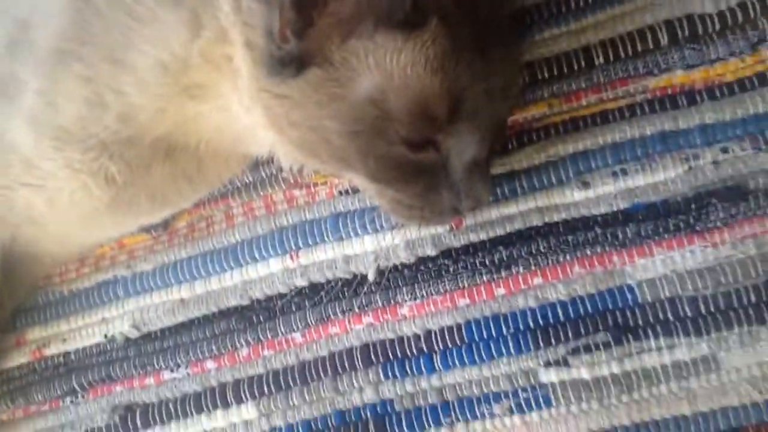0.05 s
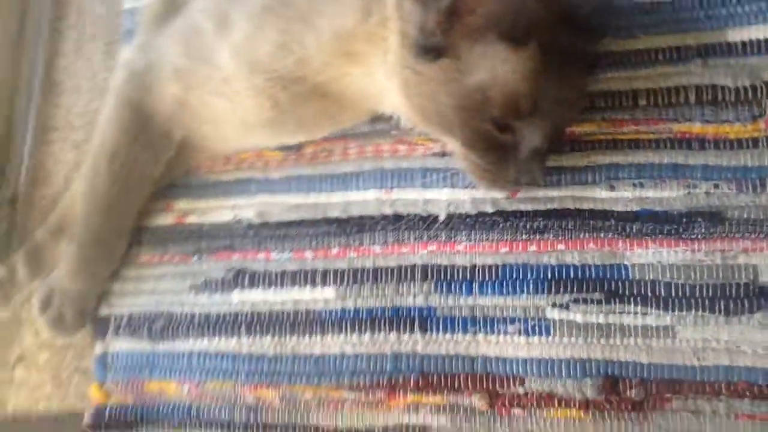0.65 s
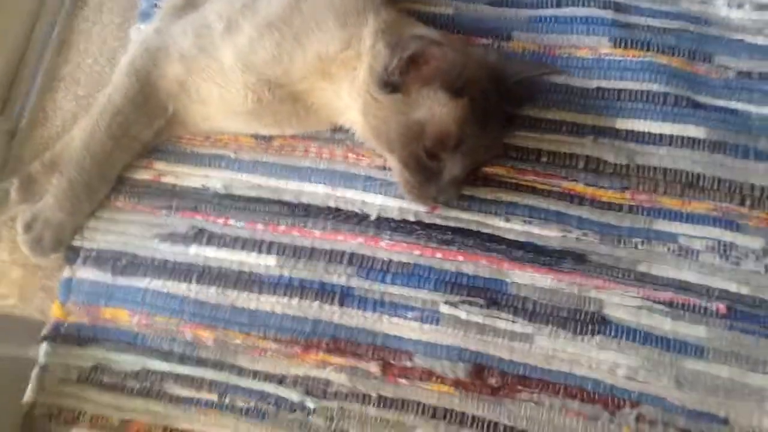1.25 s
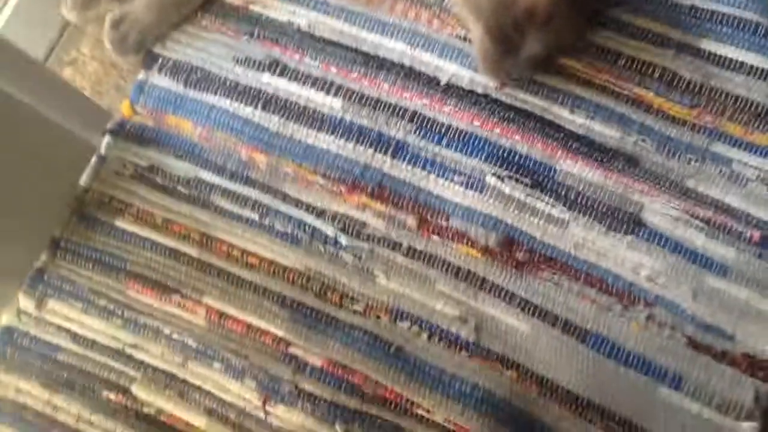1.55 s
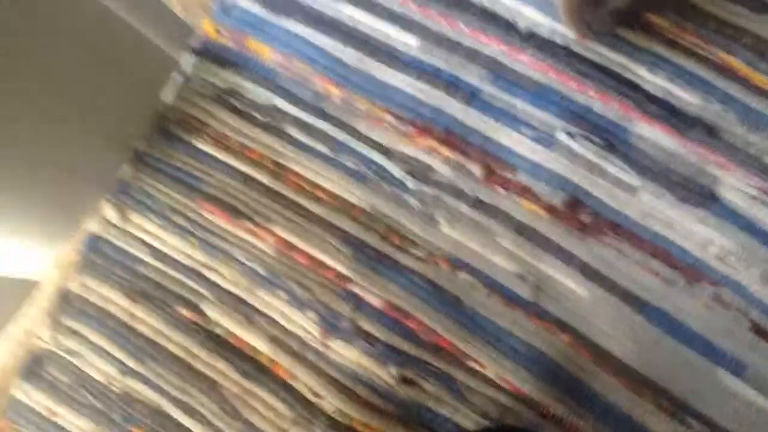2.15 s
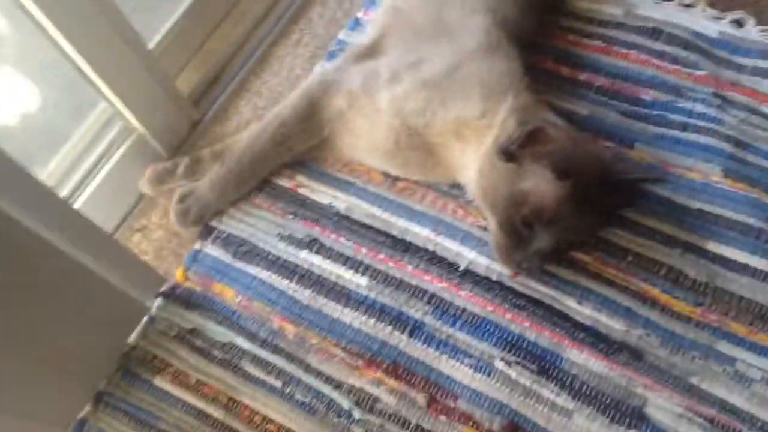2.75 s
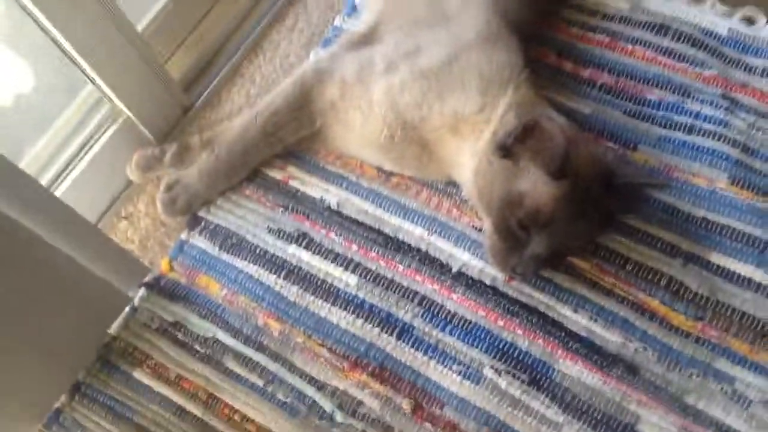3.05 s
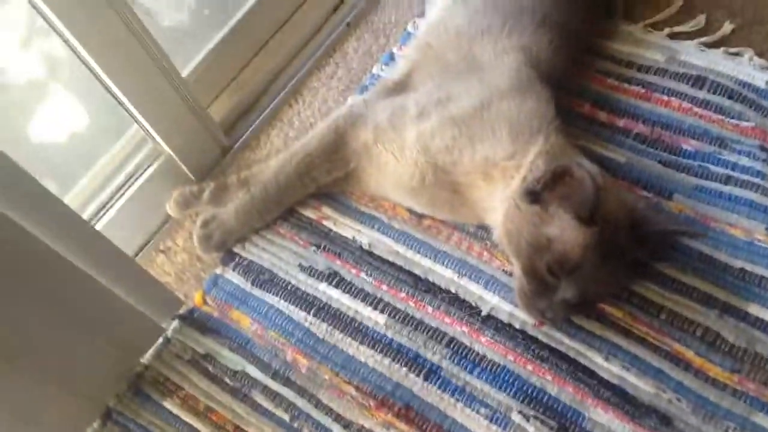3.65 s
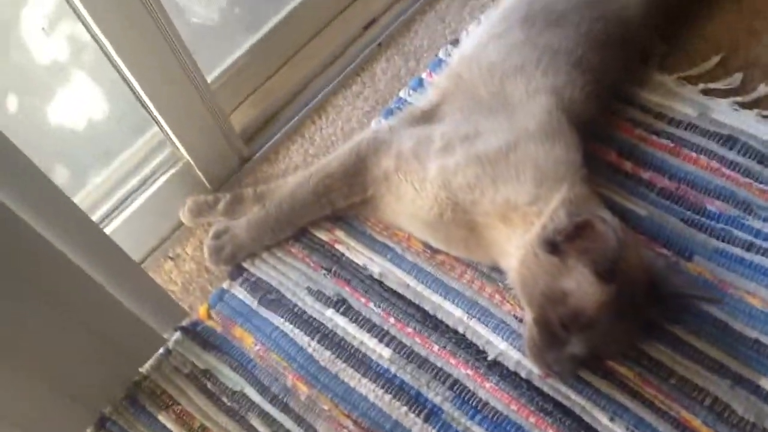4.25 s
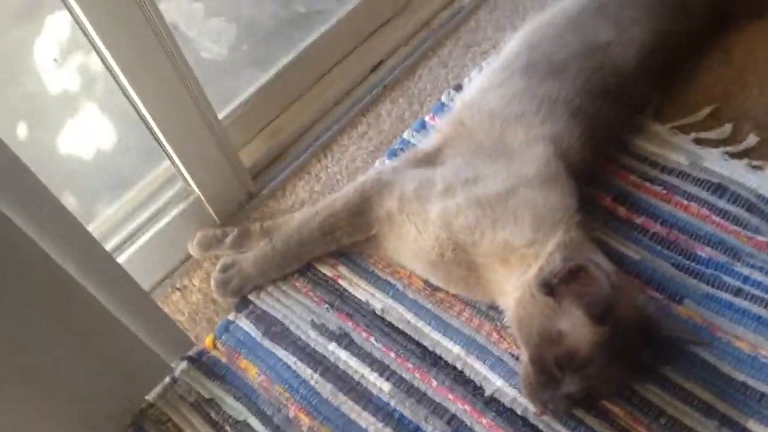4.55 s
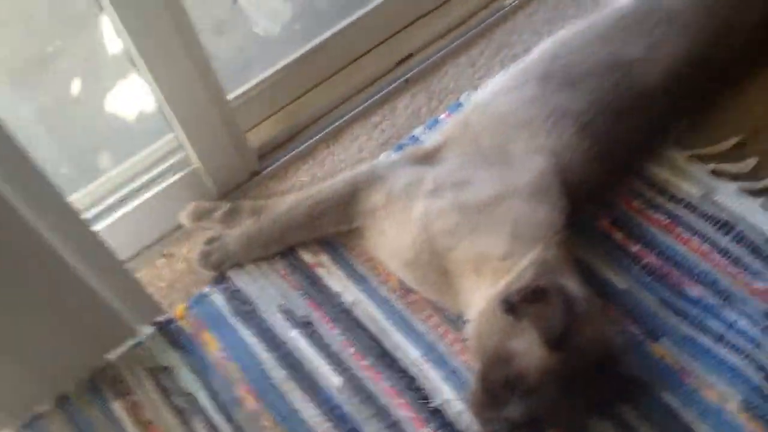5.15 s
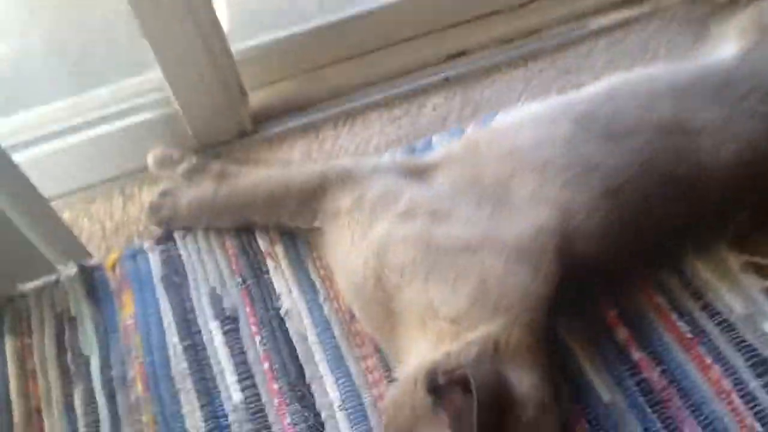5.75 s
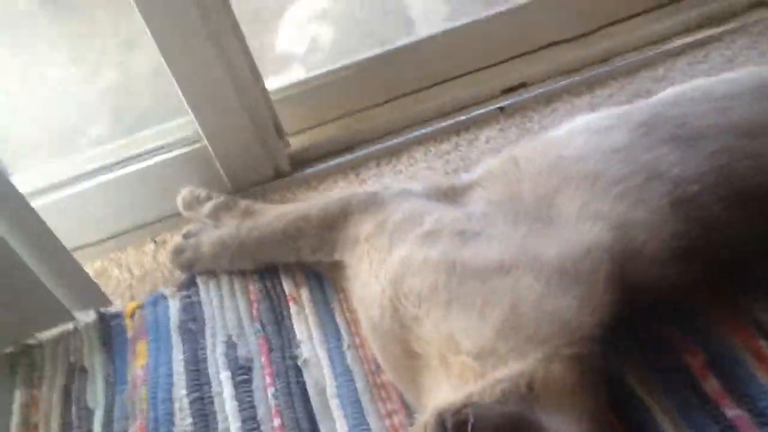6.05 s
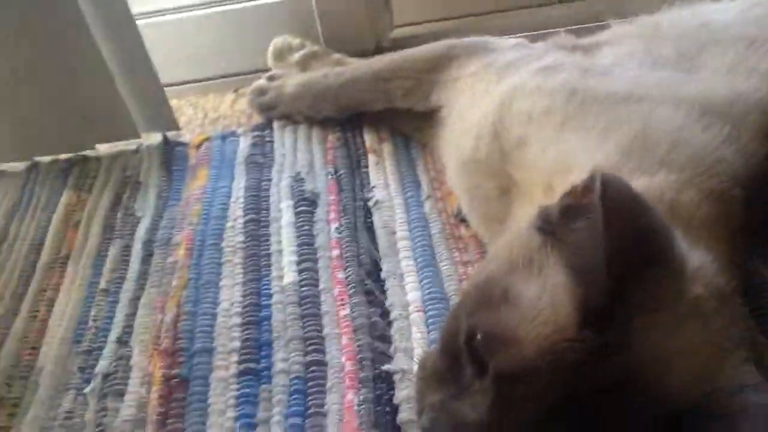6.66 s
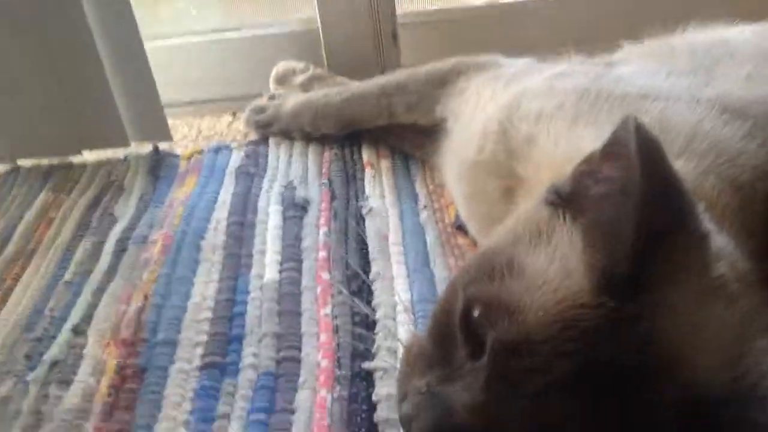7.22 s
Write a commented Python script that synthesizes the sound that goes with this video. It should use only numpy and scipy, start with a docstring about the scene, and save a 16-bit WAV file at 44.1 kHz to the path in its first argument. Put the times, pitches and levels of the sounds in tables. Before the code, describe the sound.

A quiet room is heard through a hand-held phone, with soft background noise and a faint, wavering appliance hum throughout. At about 1.6 seconds a finger scrapes across the microphone with a thump: short, rasping, very close and by far the loudest sound. Smaller knocks, rubs and sticky skin snaps follow until about 2.5 seconds, with a sharp pair of clicks near 1.9, while the finger briefly muffles the room. A couple of thin ticks come between 3 and 3.5 seconds. From about 3.8 to 6.7 seconds a small bird outside gives very faint, high, falling chirps in loose groups. From around 5.3 seconds a sleeve rustles softly, along with a slight outdoor hiss. The case ticks at 6.7 seconds, and the grip shifts with a quick double knock at 6.9. Faint rustle and hum remain until the end, at about 7.5 seconds.

```python
"""A finger scrapes loudly across a phone's microphone port, with thumps and ticks in the case.
The skin slips and sticks, rasping through the case's resonances, and briefly covers the port,
dulling the room. Later a sleeve rustles as the arm moves, and the grip shifts with a double knock.
Behind it all lies a quiet room, where an appliance hums and a small bird chirps outside."""
import sys
import numpy as np
from scipy import signal
from scipy.fft import rfft, irfft, next_fast_len
from scipy.io import wavfile
from scipy.ndimage import map_coordinates

SR = 44100
rng = np.random.default_rng(int(sys.argv[2]) if len(sys.argv) > 2 else 0)


def unload_audio(sound):
    """Save the sound as a 16-bit wav file, at the path given as the first command line argument."""
    columns = np.transpose(np.atleast_2d(sound))
    # keep every value between -1 and 1, then stretch to whole-number steps
    steps = np.round(np.clip(columns, -1, 1) * 32767)
    wavfile.write(sys.argv[1], SR, steps.astype(np.int16))


N = 330210

# Tone of the scrape. Each row: frequency in Hz, relative level in dB.
SCRAPE_SPECTRUM = [(40, -43), (75, -30), (115, -7), (200, -2.5), (290, -4), (400, -4), (580, -9.5),
                   (900, -8), (1400, -12), (2200, -18), (3200, -17), (5200, -20.5), (9000, -33.5),
                   (15500, -49)]
# Resonances of the case. Each row: centre in Hz, width in Hz, lift in dB.
CASE_RESONANCES = [(263, 52, 4.5), (380, 48, 1), (523, 64, 6), (960, 120, 1.5), (1855, 110, 8),
                   (2152, 150, 8), (2850, 240, 1.5), (5100, 380, -0.5)]
# The hand bumps the case. Each row: start in seconds, thump peak in dB, ring pitch in Hz,
# time to fade by 60 dB in seconds, click peak in dB.
HAND_KNOCKS = [(1.5094, -39, 168.5, .028, -41.5), (1.6099, -6.5, 322, 0.023, -16),
               (1.617, -20, 183, 0.096, -35), (1.6554, -14, 258, .03, -30),
               (1.7725, -28.5, 168.5, 0.046, -35.5), (1.9676, -26, 132, 0.024, -59.5),
               (2.0515, -40, 178, 0.027, -49), (2.172, -43.5, 202, 0.013, -56),
               (2.195, -56, 240, .015, -48), (2.2606, -35.5, 195, .045, -38.5),
               (2.4048, -46, 220, .015, -33.5), (2.428, -43, 200, .022, -54),
               (2.52, -45.5, 242, 0.019, -44.5), (6.4118, -56, 300, 0.0092, -47),
               (6.567, -45, 160, 0.048, -54), (6.8638, -24.5, 168, 0.016, -25.5),
               (6.8695, -20.5, 335, 0.016, -20.5), (6.8972, -23.5, 230, 0.022, -32),
               (6.906, -31, 450, 0.0087, -25.5), (6.9264, -43, 400, 0.011, -35.5),
               (7.103, -50, 300, 0.014, -45)]
# Sticky skin lets go. Each row: start in seconds, peak in dB.
SKIN_SNAPS = [(1.5096, -38), (1.9199, -19.5), (1.931, -39), (1.9386, -25.5), (1.9444, -45), (2.001, -43),
              (2.0346, -44), (2.269, -46), (2.3472, -43), (2.422, -42), (6.8277, -36)]
# Finger strokes on the case. Each row: peak time in seconds, half length in seconds, rumble in dB,
# hiss in dB, hiss centre in Hz, hiss width in octaves.
FINGER_STROKES = [(1.539, 0.052, -55, -59.5, 5000, 2.3), (1.614, 0.016, -48, -34, 5000, 0.85),
                  (1.673, 0.024, -59, -41.5, 4960, .9), (1.765, 0.021, -64, -60, 1490, 1.4),
                  (1.785, 0.021, -51, -45, 8260, 1.1), (1.878, .0072, -51.5, -37, 7540, 1.07),
                  (1.904, 0.022, -41, -62.5, 4000, 1), (1.946, 0.031, -42, -73, 2500, 0.9),
                  (2.134, 0.054, -60.5, -85, 910, .8), (2.261, 0.024, -55, -79, 1500, 0.96),
                  (2.369, 0.028, -72, -66.5, 4460, 1.3), (2.434, .042, -60, -61.5, 7000, 1.5),
                  (3.508, 0.028, -77, -67, 13100, 0.28), (3.817, .02, -77, -63, 10000, .55),
                  (4.723, 0.0074, -63, -60.5, 3800, 0.65), (6.783, 0.097, -57.5, -56.5, 9240, .45),
                  (6.874, 0.017, -58, -43, 7900, 2.9), (6.903, 0.011, -39.5, -45, 4450, 1.3),
                  (6.928, .024, -46.5, -49.5, 8160, 0.36)]
# Rumble of pressed skin. Each row: frequency in Hz, relative level in dB.
SKIN_SPECTRUM = [(30, -28.5), (90, -5), (180, 2), (300, -3), (600, -8), (1200, -18), (2500, -26.5),
                 (5000, -38), (10000, -40), (15000, -49.5)]
# Hard little ticks of the case. Each row: start in seconds, peak in dB, centre in Hz.
CASE_TICKS = [(2.401, -29, 7500), (2.4515, -44, 9000), (2.464, -39, 11000), (2.5335, -41, 10000),
              (3.126, -39.5, 12400), (3.528, -40, 12000), (6.478, -38, 6500), (6.7335, -25, 2590),
              (6.766, -34.5, 9000), (6.819, -33, 9000)]
# The finger over the port. Each row: time in seconds, share closed from 0 to 1.
PORT_COVER = [(1.7, 0.3), (1.85, 0.24), (2.02, 0.61), (2.27, 0.48), (2.36, 0)]
# Tone of the cloth. Each row: frequency in Hz, relative level in dB.
CLOTH_SPECTRUM = [(200, -0.5), (500, 0), (1500, -4), (3500, -2), (8000, -1.5), (10500, -6.5), (15000, -11)]
# Brushes of the sleeve. Each row: peak time in seconds, level in dB, half length in seconds.
SLEEVE_BRUSHES = [(5.372, -63, 0.082), (5.58, -58, 0.052), (5.895, -56, 0.047), (5.98, -59.5, 0.038),
                  (6.162, -54.5, 0.09), (6.54, -61, .07), (6.854, -59, 0.12), (7.182, -62.5, 0.092),
                  (7.347, -62.5, 0.058)]
# Falling chirps. Each row: start in seconds, relative level in dB, top pitch in Hz, length in seconds.
BIRD_CHIRPS = [(3.806, -56.5, 4800, 0.044), (3.966, -57, 4810, 0.051), (4.13, -61, 4770, 0.062),
               (4.32, -60, 4930, .05), (5.187, -60, 5830, 0.11), (5.384, -59.5, 5500, 0.09),
               (5.487, -57.5, 5700, 0.049), (5.569, -56, 5740, 0.066), (5.784, -57, 5460, 0.079),
               (5.96, -57.5, 5550, .058), (6.65, -50.5, 5520, 0.0475)]
# The appliance's hum. Each row: pitch in Hz, average level in dB, phase wander in radians.
HUM_TONES = [(84.5, -71.5, .8), (112, -72.5, 0.96), (122, -81.5, 5), (139, -74, 0.79), (175, -86.5, 3),
             (220, -69, 2.83), (233, -75.5, 1.52), (329, -75, 1.5), (350, -78.5, 1.1), (438, -77, .5),
             (544, -80, 0.78), (617, -80, .6)]
# The strongest motor tone. Each row: time in seconds, level in dB.
DRONE_LEVELS = [(0, -98), (.5, -69.5), (1.2, -67), (2.7, -71), (5.5, -67), (6.3, -74.5), (7.2, -67)]
# The thin motor whine. Each row: time in seconds, level in dB.
WHINE_LEVELS = [(0, -79), (1.4, -73), (2.6, -95), (5.5, -81.5), (7.49, -88)]
# Colour of the room tone. Each row: frequency in Hz, relative level in dB.
ROOM_SPECTRUM = [(25, -9.5), (50, -11), (72, -16.5), (110, -10), (200, 1), (290, -4.5), (400, -8),
                 (480, -11.5), (620, -10), (1000, -12.5), (2000, -17), (4000, -20), (8000, -22),
                 (15500, -23.5)]
# Drift of the room tone. Each row: time in seconds, level in dB.
ROOM_LEVELS = [(0, -59), (1.4, -58), (2.6, -61.5), (5, -60.5), (6.5, -58.5), (7.49, -60)]
# High hiss from the window. Each row: time in seconds, level in dB.
WINDOW_LEVELS = [(2.5, -83), (3.2, -69), (3.6, -77), (5.6, -74.5), (5.9, -63.5), (6.6, -64), (7.49, -78)]


def finger_scrape(contact_s=1.607, attack_s=0.005, bite_s=0.0073, slide_s=0.051, level_db=-16.5):
    """Dense slips of the fingertip, coloured by the case: a graze, a hard bite, a slide and the lift."""
    def case_db(hz):
        return sum(db / (1 + (2 * (hz - centre) / width) ** 2) for centre, width, db in CASE_RESONANCES)

    rasp = friction(lambda hz: amp(spectrum_db(SCRAPE_SPECTRUM, hz) + case_db(hz)), grain_db=3.5)
    t = clock() - contact_s
    approach_db_per_s, sag_db_per_s, lift_db_per_s = 848.5, 93.5, 700
    approach_db = -approach_db_per_s * np.maximum(-t - attack_s, 0)
    graze_db = -18 * np.clip(-t / attack_s, 0, 1)
    bite_db = 4 * swell(t, attack_s, bite_s)
    sag_db = -sag_db_per_s * np.clip(t, 0, slide_s)
    lift_db = -lift_db_per_s * np.maximum(t - slide_s, 0)
    return amp(level_db + approach_db + graze_db + bite_db + sag_db + lift_db) * rasp


def hand_knocks(build_cycles=0.36):
    """Each blow starts with a dull click and rocks the hand-damped case for a few cycles."""
    out, t = np.zeros(N), np.arange(SR // 8) / SR
    contact = click(centre_hz=593, octaves=0.92)
    for start, thump_db, hz, t60, click_db in HAND_KNOCKS:
        envelope = np.exp(-np.log(1000) * t / t60) * (1 - np.exp(-hz * t / build_cycles))
        add(out, start, amp(thump_db) * np.sin(2 * np.pi * hz * t) * envelope / envelope.max())
        add(out, start, amp(click_db) * contact)
    return out


def skin_snaps():
    """Skin sticks and snaps loose, always with the same broad click."""
    out, pulse = np.zeros(N), click(centre_hz=930, octaves=1.41)
    for start, db in SKIN_SNAPS:
        add(out, start, amp(db) * pulse)
    return out


def finger_strokes():
    """Skin under pressure gives a dull, grainy rumble; skin that slides lightly hisses."""
    pressure, hiss, t = np.zeros(N), np.zeros(N), np.arange(SR // 2) / SR
    middle = t.mean()
    for peak_s, half_length, rumble_db, hiss_db, centre_hz, octaves in FINGER_STROKES:
        shape = swell(t - middle, half_length, half_length)
        slide = friction(lambda hz: bell(hz, centre_hz, octaves) * port_ring(hz), grain_db=4, size=len(t))
        add(pressure, peak_s - middle, amp(rumble_db) * shape)
        add(hiss, peak_s - middle, amp(hiss_db) * shape * slide)
    rumble = friction(lambda hz: amp(spectrum_db(SKIN_SPECTRUM, hz)), grain_db=5.5)
    return pressure * rumble + hiss


def case_ticks():
    """The case gives under the grip with thin, bright ticks."""
    out = np.zeros(N)
    for start, db, centre_hz in CASE_TICKS:
        add(out, start, amp(db) * click(centre_hz, octaves=0.71))
    return out


def sleeve_rustle(arm_peak_s=6.57, arm_db=-61.5):
    """Cloth rubs faintly while the arm moves, and swells with each brush."""
    t = clock()
    weave = friction(lambda hz: amp(spectrum_db(CLOTH_SPECTRUM, hz)) * port_ring(hz), grain_db=2.5)
    power = (amp(arm_db) * swell(t - arm_peak_s, rise_s=0.98, fall_s=0.89)) ** 2
    for peak_s, db, half_length in SLEEVE_BRUSHES:
        power += (amp(db) * swell(t - peak_s, half_length, half_length)) ** 2
    flutter = amp(0.5 * wobble(25))
    return np.sqrt(power) * flutter * weave


def port_ring(hz, lift_db=1.5):
    """Gain of the microphone port's narrow resonance, which colours whatever brushes past it."""
    return amp(lift_db * bell(hz, centre_hz=7900, octaves=0.089))


def bird(fall_hz_per_s=26000, fade_db=5.5, warble=0.024, direct_db=-2.5, echo_db=-1.5, echo_t60=0.32):
    """Thin, wavering whistles that fall and fade, blurred by echoes on their way indoors."""
    out, t = np.zeros(N), np.arange(SR // 3) / SR
    for start, db, top_hz, length in BIRD_CHIRPS:
        progress = np.clip(t / length, 0, 1)
        waver = map_coordinates(rng.standard_normal(len(t)), [t * 400])  # 400 random knots a second
        pitch = (top_hz - fall_hz_per_s * length * progress ** 1.4) * (1 + warble * waver)
        envelope = amp(-fade_db * progress) * np.abs(np.sin(np.pi * progress ** 1.07)) ** 0.2
        note = envelope * np.sin(2 * np.pi * np.cumsum(pitch) / SR)
        tail = rng.standard_normal(len(t)) * np.exp(-np.log(1000) * t / echo_t60)
        add(out, start, amp(db + direct_db) * note)
        add(out, start, amp(db + echo_db) * signal.fftconvolve(note, tail / np.linalg.norm(tail)))
    return out


def appliance(drone_hz=415.7, whine_hz=996):
    """A motor hums unsteadily, with a drone and a thin whine that come and go."""
    def tone(hz, db, wander_rad):
        peak = np.sqrt(2) * amp(db + wobble(3.02))
        return peak * np.sin(2 * np.pi * hz * clock() + wander_rad * wobble(15))

    hum = sum(tone(*row) for row in HUM_TONES)
    drone = tone(drone_hz, curve(DRONE_LEVELS), wander_rad=0.14)
    whine = tone(whine_hz, curve(WHINE_LEVELS), wander_rad=0.3)
    return hum + drone + whine


def room_tone():
    """A soft bed of room noise and a high, flickering hiss from outdoors."""
    air = friction(lambda hz: amp(spectrum_db(ROOM_SPECTRUM, hz)), grain_db=1)
    hiss = friction(lambda hz: bell(hz, centre_hz=4800, octaves=0.28), grain_db=1)
    return amp(curve(ROOM_LEVELS)) * air + amp(curve(WINDOW_LEVELS) + wobble(10)) * hiss


def friction(response, grain_db, size=N):
    """Noise of rms 1 made of tiny slips of uneven strength; more grain_db sounds rougher."""
    slips = rng.standard_normal(size) * amp(grain_db * rng.standard_normal(size))
    noise = filtered(slips, response)
    return noise / np.sqrt(np.mean(noise ** 2) + 1e-20)


def click(centre_hz, octaves, size=2048):
    """A pulse of peak 1 with a steep front and no ring."""
    hz = np.fft.rfftfreq(size, 1 / SR)
    cepstrum = irfft(np.log(bell(hz, centre_hz, octaves) + 1e-3))
    pulse = irfft(np.exp(rfft(2 * cepstrum[:size // 2], size)))  # minimum phase: energy comes first
    return pulse / np.abs(pulse).max()


def swell(t, rise_s, fall_s):
    """A rounded envelope that peaks at t = 0."""
    return np.exp(-np.abs(t / np.where(t < 0, rise_s, fall_s)) ** 2.2)


def wobble(rate, size=4096):
    """A smooth random curve, rate knots a second."""
    times = np.linspace(0, N / SR, size)
    knots = rng.standard_normal(int(N * rate / SR) + 4)
    return np.interp(clock(), times, map_coordinates(knots, [times * rate]))


def filtered(x, response):
    """Equalise x with a gain given as a function of frequency."""
    size = next_fast_len(len(x) + 8192)
    return irfft(rfft(x, size) * response(np.fft.rfftfreq(size, 1 / SR)), size)[:len(x)]


def bell(hz, centre_hz, octaves):
    """Gain of a bell-shaped band."""
    return np.exp(-0.5 * (np.log2((hz + 1) / centre_hz) / octaves) ** 2)


def spectrum_db(rows, hz):
    """Level at hz, gliding between (Hz, dB) rows on a log frequency axis."""
    row_hz, row_db = np.transpose(rows)
    return np.interp(np.log(hz + 1), np.log(row_hz), row_db)


def curve(rows):
    """(seconds, value) rows as one value per sample."""
    return np.interp(clock(), *np.transpose(rows))


def clock():
    """Time of every sample in seconds."""
    return np.arange(N) / SR


def amp(db):
    """Decibels to gain."""
    return 10 ** (np.asarray(db) / 20)


def add(track, start_s, sound):
    """Mix a sound into the track from start_s on."""
    part = track[max(round(start_s * SR), 0):][:len(sound)]
    part += sound[:len(part)]


def scene(muffle_hz=600):
    """The covering finger dulls the airborne sounds; contact sounds come straight through the case."""
    airborne = room_tone() + appliance() + bird() + sleeve_rustle()
    treble = filtered(airborne, lambda hz: hz ** 2 / (hz ** 2 + muffle_hz ** 2))
    contact = finger_scrape() + finger_strokes() + hand_knocks() + skin_snaps() + case_ticks()
    return (airborne - curve(PORT_COVER) * treble + contact)[None]


def record(dry, low_cut_hz=80, top_hz=15350):
    """The phone cuts the deep bass and keeps nothing above its band limit."""
    thinned = signal.sosfilt(signal.butter(3, low_cut_hz, "highpass", fs=SR, output="sos"), dry)
    return np.array([filtered(channel, lambda hz: hz < top_hz) for channel in thinned])


dry = scene()
out = record(dry)
unload_audio(out)
```